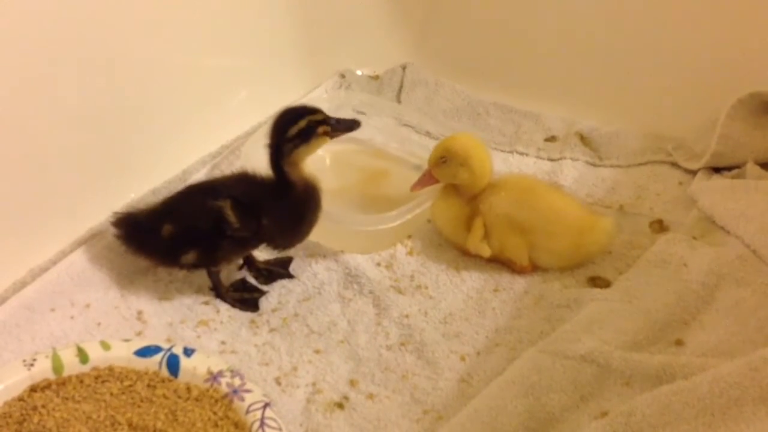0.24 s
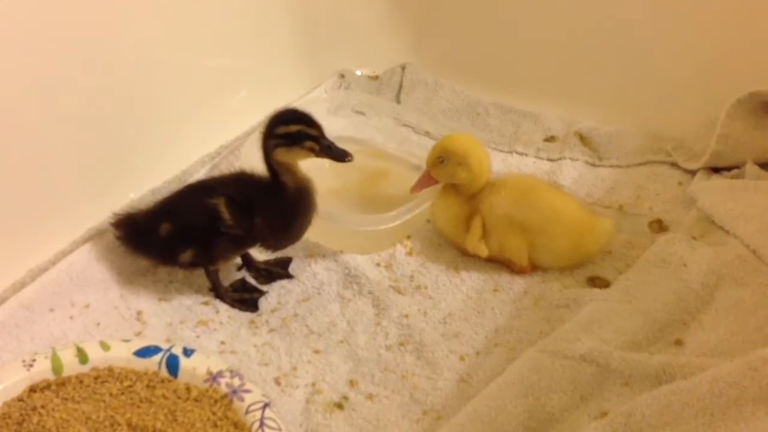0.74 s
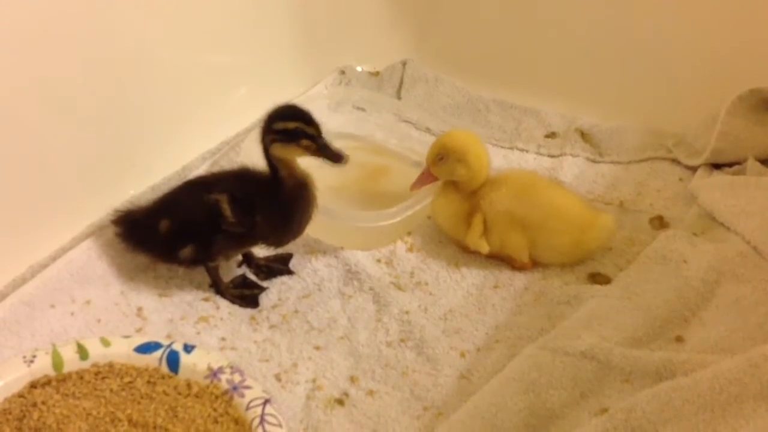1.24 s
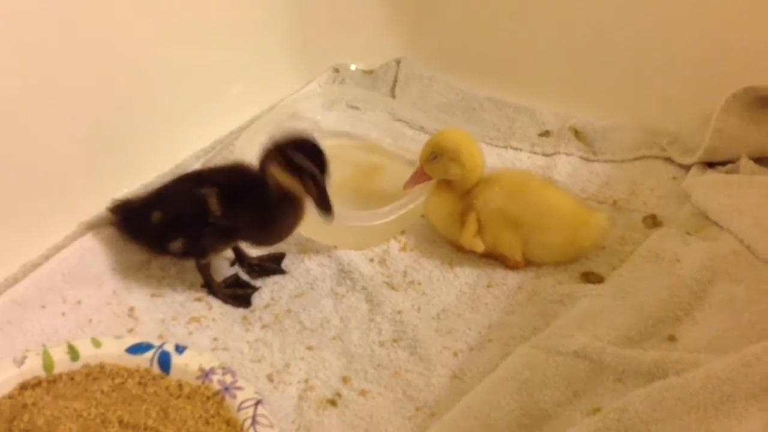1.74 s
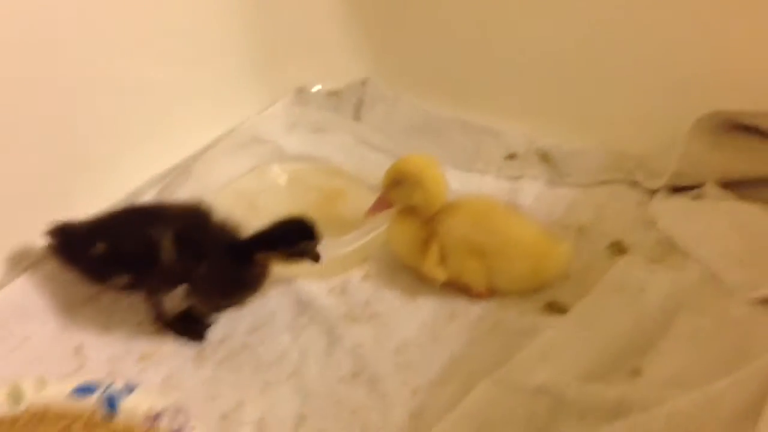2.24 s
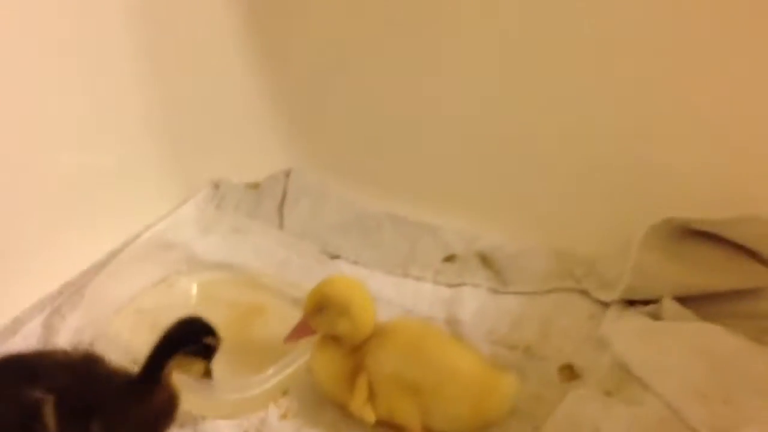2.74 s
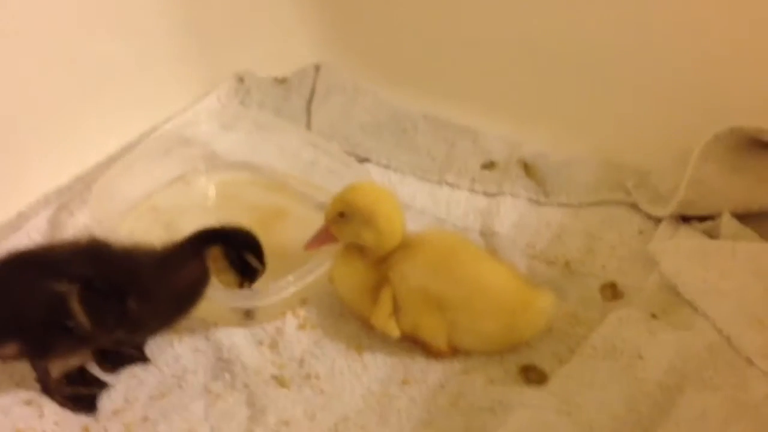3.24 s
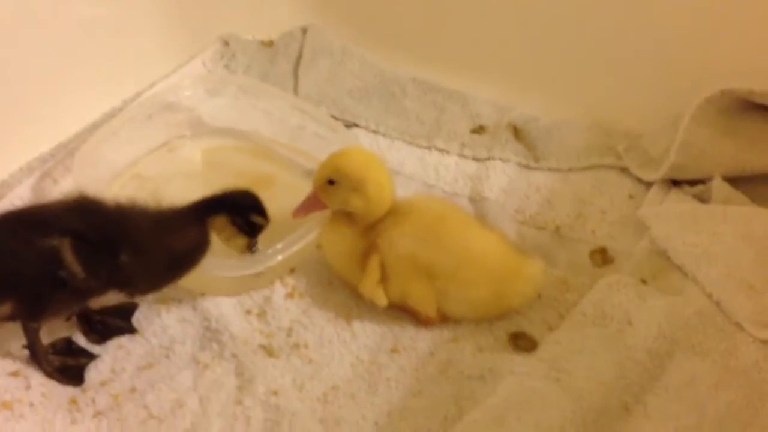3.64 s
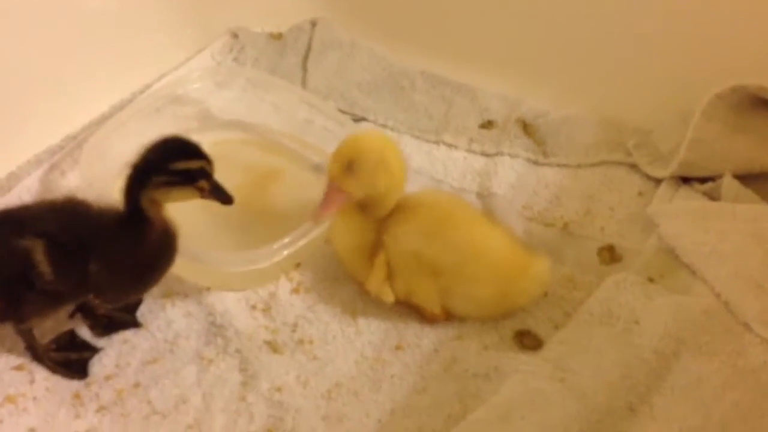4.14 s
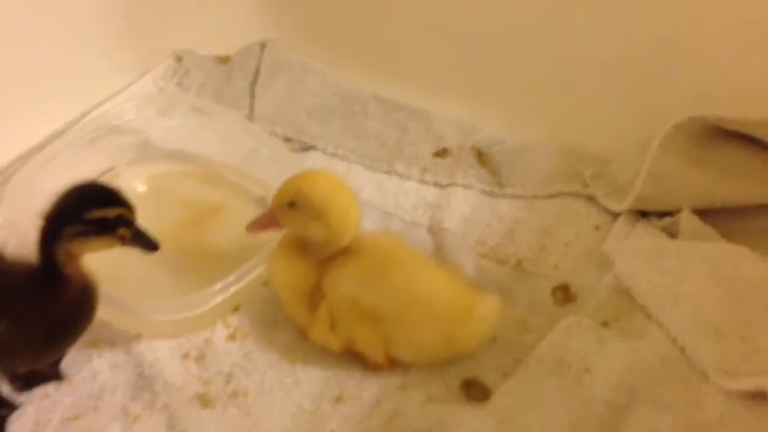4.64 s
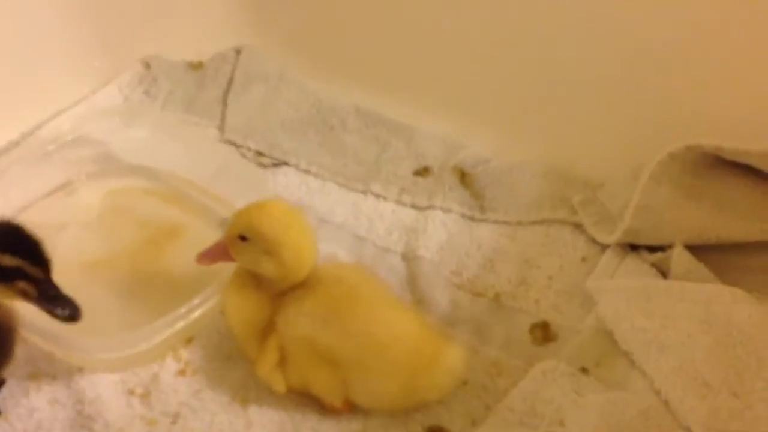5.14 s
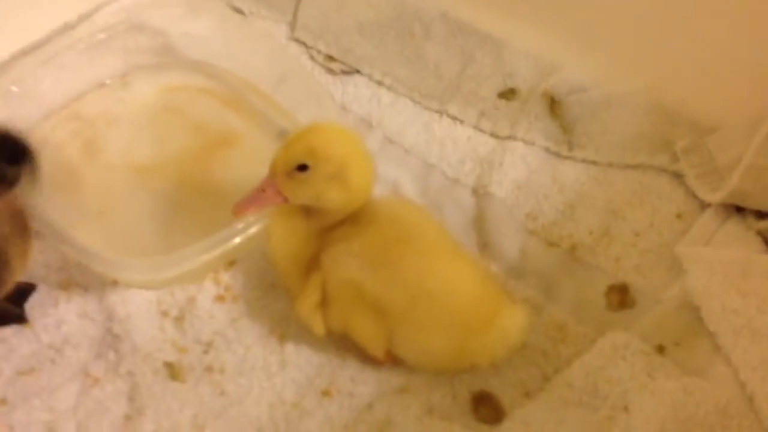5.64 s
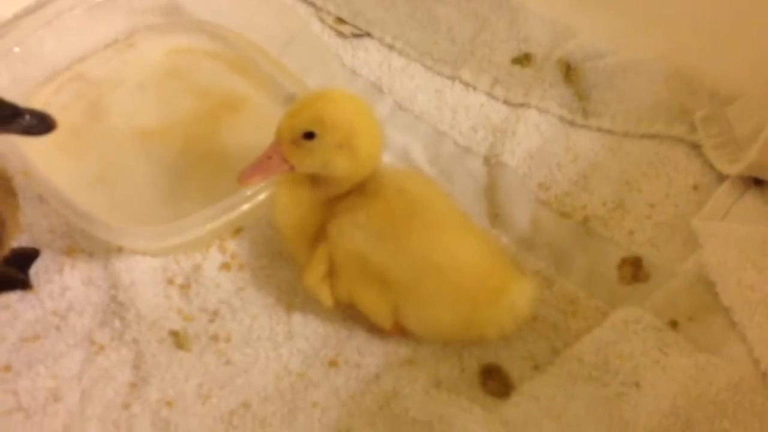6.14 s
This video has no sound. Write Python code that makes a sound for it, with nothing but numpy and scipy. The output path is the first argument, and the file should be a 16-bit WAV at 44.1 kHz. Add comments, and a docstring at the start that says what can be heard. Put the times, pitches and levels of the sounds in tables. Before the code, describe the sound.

High duckling peeps in a bathtub, followed by wet bill ticks, a hollow knock, a tap and close handling noise.

```python
"""Duckling in a bathtub

A small hard room with a faint fan hum, heard on one camera microphone. In a towel-lined tub a duckling
whistles five peeps, then dabbles in its water dish and shuffles about. Something knocks against the tub,
a sharp tap follows, and the room rings with both. Right by the microphone, a hand rubs and bumps the case."""
import sys
import numpy as np
from scipy import signal
from scipy.fft import rfft, irfft
from scipy.io import wavfile
from scipy.ndimage import uniform_filter1d

SR = 44100
rng = np.random.default_rng(int(sys.argv[2]) if len(sys.argv) > 2 else 0)


def master_out(mix):
    """Clip the mix to full scale and print it as 16-bit PCM to the path in sys.argv[1]."""
    frames = np.transpose(np.atleast_2d(mix))
    ceiling = np.clip(frames, -1, 1)
    pcm = np.round(ceiling * 32767).astype(np.int16)
    wavfile.write(sys.argv[1], SR, pcm)


N = 281622
TIME = np.arange(N) / SR

# reverberation of the room: freq_hz, t60_s
ROOM_DECAY = [(100, 0.65), (250, 0.99), (700, 0.54), (1500, 0.59), (3000, 0.59), (5500, 0.59), (9000, 0.28),
              (15000, 0.12)]
# spectrum of the room tone: freq_hz, gain_db
AIR_SPECTRUM = [(15, -53), (25, -45.5), (44, -16.5), (69, -10.5), (86, -21.5), (140, -10), (169, -7.5),
                (304, -10.5), (565, -13), (646, -12.5), (700, -16), (1890, -20), (3240, -20.5),
                (12800, -24.5), (15400, -28)]
# tones of the fan: pitch_hz, level_db
FAN_TONES = [(60, -83), (120, -85.5), (171, -73.5), (242, -84.5)]
# bubbles popping in the dish: start_s, level_db, pitch_hz
BUBBLES = [(0.3756, -48.5, 1690), (2.809, -46, 2350), (2.8155, -31.5, 5120), (2.869, -36.5, 4280),
           (2.8747, -32.5, 2750), (2.921, -40, 2050), (2.972, -40, 2800), (2.974, -36, 3560),
           (2.984, -37, 3020), (3.0026, -36, 2860), (3.039, -37.5, 2210), (3.501, -47.5, 1400),
           (3.622, -46, 5060), (3.671, -46.5, 2770), (3.685, -44, 1360), (3.773, -47, 2510),
           (3.84, -49.5, 2550), (3.885, -49, 2600)]
# wet ticks of the bill on the dish: start_s, level_db, centre_hz
BILL_TICKS = [(0.376, -53, 3500), (2.816, -37.5, 7300), (2.875, -40.5, 6900), (3.004, -42, 5400),
              (3.355, -47, 14000), (3.501, -44.5, 2200), (3.613, -41, 5000), (3.640, -44, 6800),
              (3.675, -44, 5000), (3.688, -42, 5500), (3.707, -44, 8900), (3.772, -47, 11970),
              (3.797, -42, 12000), (3.825, -46.5, 7000), (4.046, -43, 7160), (4.08, -41, 12000)]
# the duckling's calls, with crest, low note and dip timed from each start:
# start_s, length_s, crest_s, low_s, dip_s, crest_hz, low_hz, second_crest_hz, level_db
PEEP_CALLS = [(1.326, .160, .040, 0.068, .083, 2800, 2410, 2790, -42.5),
              (1.624, .137, 0.03, 0.063, .037, 2965, 2660, 2850, -36.5),
              (1.907, .136, 0.026, .047, .078, 2945, 2810, 3010, -39.5),
              (2.191, .138, .038, .106, 0.0855, 3120, 2915, 2940, -43.5),
              (2.467, .138, .031, 0.055, .091, 3250, 2952, 3180, -35.5)]
# low notes spread from the bill into the room more than high ones: freq_hz, gain_db
PEEP_SPREAD = [(1900, 9), (2600, 3.3), (3100, 1.5), (5500, 2)]
# short finger rubs on the case: start_s, length_s, scrape_db, hiss_db
FINGER_RUBS = [(1.92, .11, -66.5, -66), (2.032, 0.038, -56.5, -62), (2.215, .09, -58.5, -66.5),
               (2.33, .06, -57.5, -64), (2.395, .085, -51, -53), (2.48, .08, -54.5, -57),
               (2.62, .06, -64, -63.5), (2.814, .24, -71.5, -65), (4.027, 0.044, -53, -69.5),
               (4.134, .11, -64, -66)]
# one long slide of the hand: time_s, scrape_db, hiss_db
HAND_SLIDE = [(4.26, -63.5, -63.5), (4.44, -64, -63), (4.508, -61, -60.5), (4.868, -61.5, -63.5),
              (4.902, -57.5, -59.5), (5.134, -58, -56), (5.172, -57.5, -60.5), (5.588, -55, -52.5),
              (5.684, -62, -61.5), (5.7, -58.5, -60.5), (5.8, -74, -77)]
# spectra of the scraped case and of the hissing skin: freq_hz, gain_db
SCRAPE_SPECTRUM = [(40, -29), (80, -12.5), (115, -6.5), (155, 3.5), (200, -2), (250, 0), (400, -4.5),
                   (700, -8), (1000, -5.5), (1400, -7), (2200, -14), (2900, -10.5), (4000, -28.5),
                   (9000, -37.5)]
SKIN_SPECTRUM = [(300, -27), (1500, -3.5), (2200, -4.5), (3000, 0), (3700, 1.5), (6000, 1.5), (9000, 1),
                 (12000, -3.5), (15500, -4)]
# fingers landing on the case: start_s, thud_db, thud_hz, click_db
FINGER_BUMPS = [(2.026, -52, 160, -52), (2.23, -52, 199, -35), (2.245, -63, 248, -39),
                (2.313, -58, 200, -35), (2.672, -54, 200, -37), (2.6937, -35.5, 191, -26.5),
                (3.706, -40, 195, -44), (4.037, -44.5, 340, -42), (5.905, -41.5, 192, -52),
                (6.2097, -39, 244, -54)]
# skin catching on the case: start_s, level_db, centre_hz, decay_s
SKIN_CATCHES = [(2.407, -38.5, 5960, .0085), (4.523, -39.5, 5050, 0.0047), (4.574, -40, 1500, .007),
                (4.831, -42.5, 1400, .005), (5.075, -41.5, 4200, 0.032), (5.211, -37.5, 1700, 0.0061),
                (5.263, -38.5, 1510, .01), (5.293, -36.5, 2000, 0.0076), (5.416, -36.5, 1150, .013),
                (5.365, -42, 1800, .006), (5.482, -37, 1900, 0.0043), (5.572, -34, 5500, 0.01),
                (5.701, -45, 1200, .009)]
# spectra of the two blows: freq_hz, gain_db
KNOCK_SPECTRUM = [(40, -53), (85, -20), (135, 3.5), (260, -2), (340, -9.5), (520, -2), (780, 2.5),
                  (1000, -.5), (1500, -8), (2200, -8.5), (3200, -15), (5000, -19), (8000, -26.5),
                  (15000, -38)]
TAP_SPECTRUM = [(100, -22), (440, -21), (630, 2), (1200, -3.5), (1900, 2), (2500, -9), (4200, -17),
                (7000, -16), (11000, -22), (15000, -26)]
# modes of the briefly flexing wall, the ringing tub and the tapped thing: pitch_hz, level_db, t60_s
WALL_MODES = [(617, -17.5, 0.022), (970, -11.5, 0.01), (1490, -17.5, 0.0083), (2180, -25, 0.014)]
TUB_RING = [(135, -38, 0.29), (152.4, -30, 0.37), (225, -44.5, 0.61), (254, -46, .5), (363, -44.5, 0.62),
            (395, -48, 0.92), (471.4, -35, 0.38), (547, -40.5, 0.43), (612, -50, 0.42), (745, -53.5, 0.3),
            (872, -46, 0.23), (990, -36, 0.17), (1133, -52, 0.32), (1364, -41, 0.24), (1580, -44, 0.25),
            (2185, -46, 0.3)]
TAP_RING = [(683, -30, 0.047), (1070, -36, 0.022), (2750, -27.5, 0.0073), (6400, -26.5, 0.0029),
            (648, -43.5, 0.21), (1044, -48.5, 0.33), (1561, -57, .45), (1720, -59, 0.24), (1813, -50, 0.47)]
# webbed feet on the towel: start_s, length_s, level_db
FOOTSTEPS = [(3.376, 0.058, -57.5), (3.577, 0.048, -60), (3.642, 0.06, -59.5), (3.797, 0.02, -56),
             (3.864, .015, -66.5)]


def amp(db):
    """Decibels to gain."""
    return 10 ** (np.asarray(db) / 20)


def unit(x):
    """Scales to rms 1."""
    return x / np.sqrt(np.mean(x ** 2) + 1e-20)


def curve_at(points, hz):
    """Reads a curve on a log-frequency axis."""
    freqs, values = np.transpose(points)
    return np.interp(np.log(hz + 1), np.log(freqs + 1), values)


def add(mix, start_s, sound):
    """Mixes a sound in at a time."""
    part = mix[round(start_s * SR):][:len(sound)]
    part += sound[:len(part)]


def equalise(x, spectrum):
    """Filters a signal by a curve in dB."""
    gain = amp(curve_at(spectrum, np.fft.rfftfreq(len(x), 1 / SR)))
    return irfft(rfft(x) * gain, len(x))


def coloured(x, spectrum):
    """Gives a signal a spectrum, at rms 1."""
    return unit(equalise(x, spectrum))


def drift(rate_hz):
    """Smooth random wander up to a given rate, at rms 1."""
    hz = np.fft.rfftfreq(N, 1 / SR)
    return unit(irfft(rfft(rng.standard_normal(N)) / (1 + (hz / rate_hz) ** 4), N))


def ramp(t, start, end):
    """Goes from 0 to 1 between two times."""
    return np.clip((t - start) / max(end - start, 1e-4), 0, 1)


def swell(start_s, length_s, attack_s=.018, fade_db_per_s=200):
    """An envelope that rises, holds until its length is up, then fades."""
    fade = amp(-fade_db_per_s * np.maximum(TIME - start_s - length_s, 0))
    return ramp(TIME, start_s, start_s + attack_s) * fade


def ring(hz, t60_s, glide=0., size=32768):
    """A dying sine whose pitch may glide by a share of itself."""
    t = TIME[:size]
    pitch = hz * (1 + glide * np.minimum(t / t60_s, 1))
    return amp(-60 * t / t60_s) * np.sin(2 * np.pi * np.cumsum(pitch) / SR)


def snap(centre_hz, decay_s, size=2048):
    """A brief crack of noise around a frequency, peak 1."""
    band_hz = np.clip([centre_hz / 2, centre_hz * 1.5], 50, SR / 2 - 500)
    burst = rng.standard_normal(size) * np.exp(-TIME[:size] / decay_s)
    crack = signal.lfilter(*signal.butter(1, band_hz, "band", fs=SR), burst)
    return crack / abs(crack).max()


def grains(per_s, spread_db):
    """Random clicks, mostly small and a few large, at rms 1."""
    sizes = amp(spread_db * np.minimum(rng.exponential(1, N), 5))
    return unit(sizes * rng.choice([-1., 1.], N) * (rng.random(N) < per_s / SR))


def patchy(x, depth_db):
    """Lets the colour wander in patches of some 40 ms by 500 Hz, at rms 1."""
    bands = signal.stft(x, SR, nperseg=512, noverlap=384)[2]
    patches = uniform_filter1d(rng.standard_normal(bands.shape), 6, axis=0)
    patches = unit(uniform_filter1d(patches, 14, axis=1))
    return unit(signal.istft(bands * amp(depth_db * patches), SR, nperseg=512, noverlap=384)[1][:N])


def room(x, first_echo_s=.002, echoes_per_s=5000, early_db=5, early_s=.014, size=32768):
    """Hard walls close by: dense echoes, strong at first, each band dying at its own speed."""
    t = TIME[:size]
    echoes = rng.choice([-1., 1.], size) * (rng.random(size) < echoes_per_s / SR) * (t > first_echo_s)
    echoes *= amp(early_db * np.exp(-t / early_s))
    hz, frame_s, bands = signal.stft(echoes, SR, nperseg=256)
    decay = amp(-60 * frame_s / curve_at(ROOM_DECAY, hz)[:, None])
    tail = signal.istft(bands * decay, SR, nperseg=256)[1]
    return signal.fftconvolve(x, tail / np.linalg.norm(tail))[:N]


def air_and_fan(air_db=-66, waver=.295):
    """Room tone: an even hiss of air, and fan tones wavering in level and phase."""
    fan = np.zeros(N)
    for hz, db in FAN_TONES:
        level = np.sqrt(2) * amp(db) * (1 + waver * drift(4.9))
        fan += level * np.sin(2 * np.pi * hz * TIME + waver * drift(6.7))
    return fan + amp(air_db) * coloured(rng.standard_normal(N), AIR_SPECTRUM)


def dabbling(nibbling_s=(3.4, 4.6), nibble_count=22, nibble_db=-50, nibble_hz=8500):
    """At the dish, tiny bubbles ring and rise in pitch while the bill ticks on the plastic."""
    bubbles, ticks = np.zeros(N), np.zeros(N)
    onset = 1 - np.exp(-TIME[:2048] / .00019)
    for start_s, db, hz in BUBBLES:
        add(bubbles, start_s, amp(db) * onset * ring(hz, t60_s=.012, glide=.11, size=2048))
    nibbles = [(np.interp(when, (-1, 1), nibbling_s), nibble_db + 4 * strength, nibble_hz * 2 ** octaves)
               for when, strength, octaves in rng.uniform(-1, 1, (nibble_count, 3))]
    for start_s, db, hz in BILL_TICKS + nibbles:
        add(ticks, start_s, amp(db) * snap(hz, decay_s=.0015))
    return bubbles + ticks + room(amp(-9) * bubbles + amp(-8) * ticks)


def peep_contour(t, call, start_hz=1679, end_hz=1500, fall_s=.018):
    """Pitch and level of a peep: it sweeps up, sags as it grows full, climbs again and drops away."""
    _, length_s, crest_s, low_s, _, crest_hz, low_hz, second_crest_hz, db = call
    drop_s = length_s - fall_s
    rise = (start_hz - crest_hz) * (1 - ramp(t, 0, crest_s)) ** 1.8
    sag = (low_hz - crest_hz) * np.sin(np.pi / 2 * ramp(t, crest_s, low_s)) ** 1.695
    climb = (second_crest_hz - low_hz) * np.sin(np.pi / 2 * ramp(t, low_s, drop_s)) ** 4.21
    drop = (end_hz - second_crest_hz) * ramp(t, drop_s, length_s) ** 1.5
    level_db = np.interp(t, [0, crest_s, crest_s + .021, drop_s - .032, drop_s, length_s],
                         [-53.5, db - 7.5, db, db, db - 4.5, -55])
    return crest_hz + rise + sag + climb + drop, level_db


def peep_dips(depth_db=-12, half_width_s=.004):
    """A gain that dips briefly once in each peep."""
    centres_s = [start_s + dip_s for start_s, _, _, _, dip_s, *_ in PEEP_CALLS]
    return amp(depth_db * sum(np.exp(-((TIME - s) / half_width_s) ** 2) for s in centres_s))


def peeps(jitter=.0092, flutter_db=1.4, edge_offset_hz=760, throat_hz=5250, wall_delay_s=.002603):
    """The duckling's near-pure whistle, brightest on its high notes; the tub wall throws it back."""
    voice = np.zeros(N)
    waver, flutter, rasp = drift(200), drift(115), drift(610)
    edge_phase = 2 * np.pi * np.cumsum(edge_offset_hz * (1 + .1 * drift(230))) / SR
    husk_spectrum = [(1200, -45), (1900, -5), (2500, 3), (3300, -14), (5000, -52)]
    husk = amp(-27) * coloured(rng.standard_normal(N), husk_spectrum)
    for call in PEEP_CALLS:
        start_s, length_s = call[:2]
        t = TIME[:round(length_s * SR)]
        span = round(start_s * SR) + np.arange(len(t))
        hz, level_db = peep_contour(t, call)
        phase = 2 * np.pi * np.cumsum(hz * (1 + jitter * waver[span])) / SR
        whistle = amp(level_db) * (np.sin(phase) + husk[span]) * signal.windows.tukey(len(t), .06)
        throat = 1 / np.sqrt(1 + (throat_hz / (2 * hz)) ** 24)  # overtones of low notes hardly carry
        upper = amp(-17.5) * (np.sin(3 * phase) + np.sin(4 * phase))
        overtones = amp(-58.5) * throat * (np.sin(2 * phase) + upper)
        hoarse_edge = amp(-64.5) * (hz / 3000) ** 6 * np.sin(phase + edge_phase[span])
        bright = (overtones + hoarse_edge) * signal.windows.tukey(len(t), .28)
        roughness = amp(flutter_db * flutter[span]) * (1 + amp(-23) * rasp[span])
        add(voice, start_s, np.sqrt(2) * (whistle + bright) * roughness)
    wall_echo = amp(-12) * np.interp(TIME - wall_delay_s, TIME, voice)
    reverb = amp(-9.8) * room(equalise(voice, PEEP_SPREAD))
    return peep_dips() * (voice + wall_echo + reverb)


def hand_rubbing(grip_db=.77, lumps_db=1.1):
    """Skin slides by the microphone in thousands of tiny slips; the uneven grip sways level and colour."""
    times_s, *levels_db = np.transpose(HAND_SLIDE)
    contact = swell(times_s[0], times_s[-1] - times_s[0])
    scrape_level, hiss_level = (contact * amp(np.interp(TIME, times_s, db)) for db in levels_db)
    for start_s, length_s, scrape_db, hiss_db in FINGER_RUBS:
        rub = swell(start_s, length_s)
        scrape_level = np.hypot(scrape_level, amp(scrape_db) * rub)
        hiss_level = np.hypot(hiss_level, amp(hiss_db) * rub)
    slips = grains(per_s=6000, spread_db=2.2)
    lumpy_slips = slips * amp(lumps_db * drift(52))
    scrape = patchy(coloured(lumpy_slips, SCRAPE_SPECTRUM), depth_db=2.5)
    hiss = patchy(coloured(.75 * slips + rng.standard_normal(N), SKIN_SPECTRUM), depth_db=1.6)
    grip = amp(grip_db * drift(41))
    return grip * (amp(.4) * scrape_level * scrape + amp(2.5) * hiss_level * hiss)


def finger_bumps(room_db=-9):
    """A finger lands on the case: a small click and a dull thud that sags in pitch."""
    out = np.zeros(N)
    for start_s, thud_db, thud_hz, click_db in FINGER_BUMPS:
        add(out, start_s, amp(thud_db) * ring(thud_hz, t60_s=.019, glide=-.32, size=4096))
        add(out, start_s, amp(click_db) * snap(centre_hz=6000, decay_s=.00046))
    return out + amp(room_db) * room(out)


def skin_scratches(rise_s=.0019):
    """Short rasps, close and dry, where the sliding skin sticks and lets go."""
    out = np.zeros(N)
    onset = 1 - np.exp(-TIME[:4096] / rise_s)
    for start_s, db, hz, decay_s in SKIN_CATCHES:
        add(out, start_s, amp(db) * onset * snap(hz, decay_s, size=4096))
    return out


def blow(spectrum, modes, start_s, push_db, room_db, size=4096):
    """A knock or tap: one sharp push sets the room and the struck body ringing."""
    log_gain = np.log(amp(curve_at(spectrum, abs(np.fft.fftfreq(size, 1 / SR)))))
    minimum_phase = np.exp(np.conj(signal.hilbert(log_gain)))  # nothing sounds before the contact
    push = np.fft.ifft(minimum_phase).real[:size // 2]
    out = np.zeros(N)
    add(out, start_s, -amp(push_db) * push / np.linalg.norm(push))
    out += amp(room_db) * room(out)
    for hz, db, t60_s in modes:
        add(out, start_s + rng.random() / hz, amp(db) * ring(hz, t60_s))
    return out


def shuffling():
    """Webbed feet crumple the towel, and the tub under it murmurs."""
    spectrum = [(50, -27), (150, .5), (300, -6.5), (700, -14), (2500, -23), (6000, -31), (15000, -31)]
    level = sum(amp(db) * swell(start_s, length_s, attack_s=.013, fade_db_per_s=166)
                for start_s, length_s, db in FOOTSTEPS)
    return level * coloured(grains(per_s=700, spread_db=3), spectrum)


def scene(bass_cut_hz=113):
    """One small microphone on both channels; rubbing, scratches and room tone keep their bass."""
    knock = blow(KNOCK_SPECTRUM, WALL_MODES + TUB_RING, start_s=3.0909, push_db=-2.5, room_db=-1.1)
    tap = blow(TAP_SPECTRUM, TAP_RING, start_s=4.1208, push_db=-12.5, room_db=0)
    duckling = peeps() + dabbling() + shuffling()
    bass_cut = signal.butter(5, bass_cut_hz, "high", fs=SR, output="sos")
    thinned = signal.sosfilt(bass_cut, duckling + knock + tap + finger_bumps())
    mono = thinned + hand_rubbing() + skin_scratches() + air_and_fan()
    return np.array([mono, mono])


def record(dry):
    """The recorder's steep band limit."""
    lowpass = signal.firwin(511, cutoff=15600, window=("kaiser", 9), fs=SR)
    return signal.oaconvolve(dry, lowpass[None], "same")


dry = scene()
out = record(dry)
master_out(out)
```